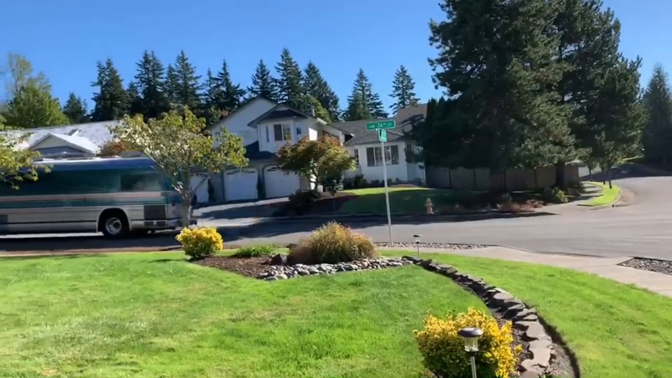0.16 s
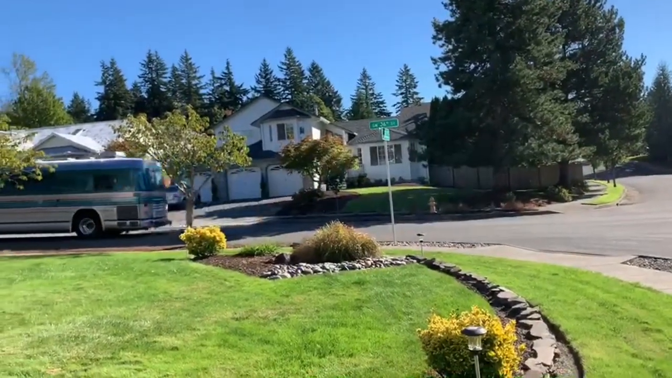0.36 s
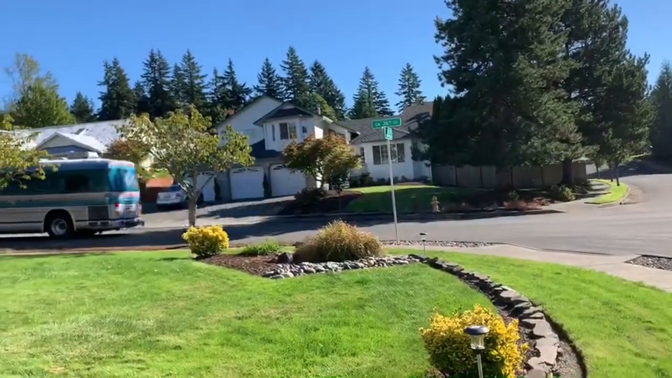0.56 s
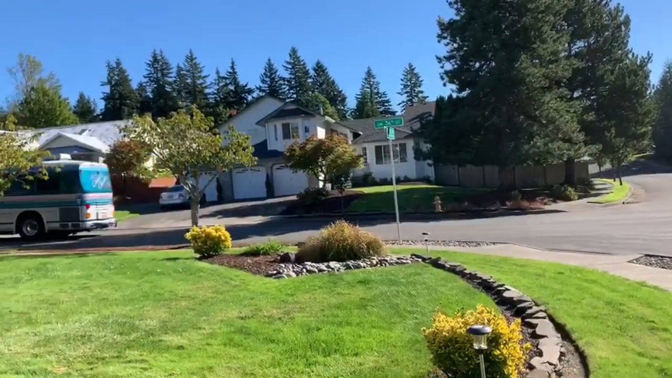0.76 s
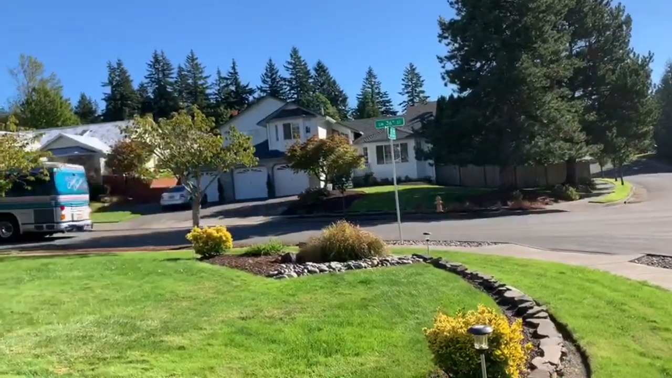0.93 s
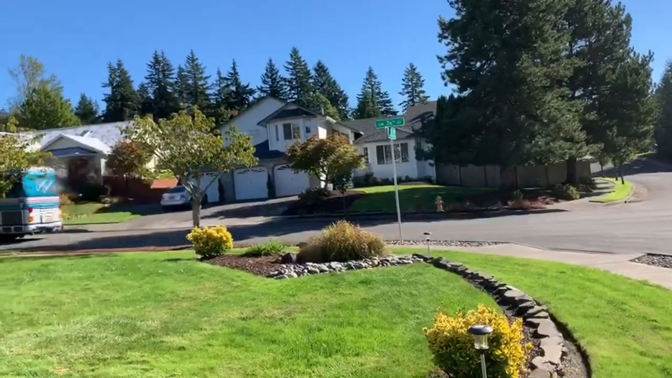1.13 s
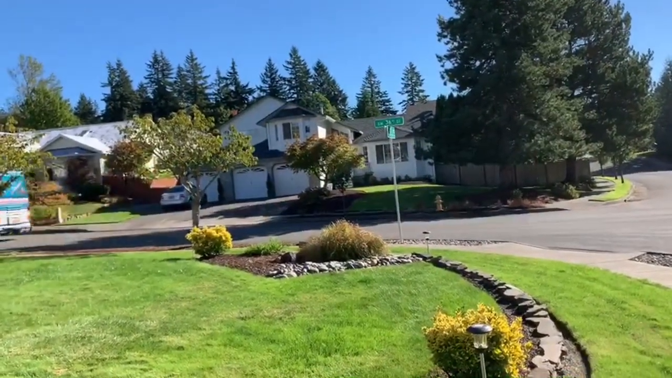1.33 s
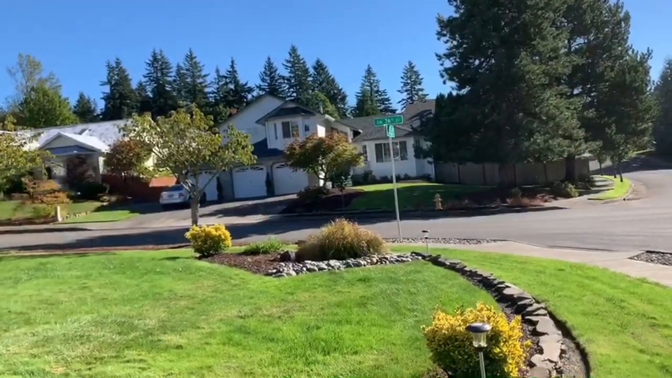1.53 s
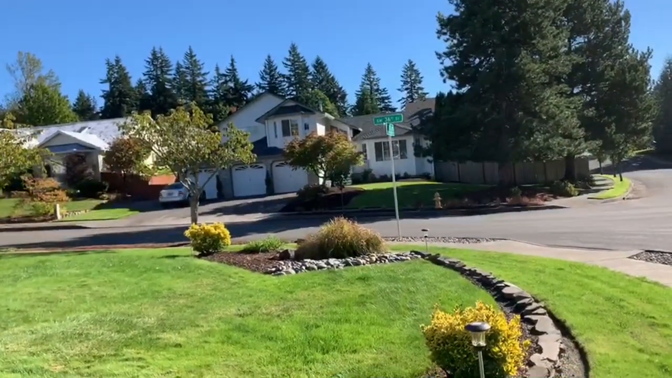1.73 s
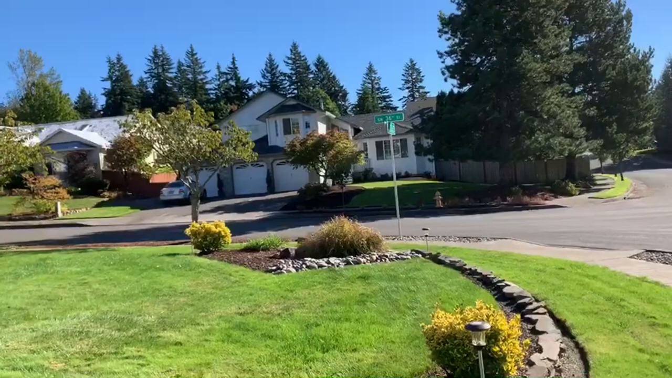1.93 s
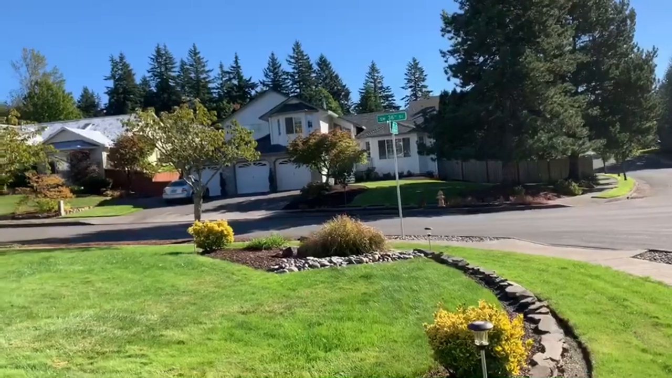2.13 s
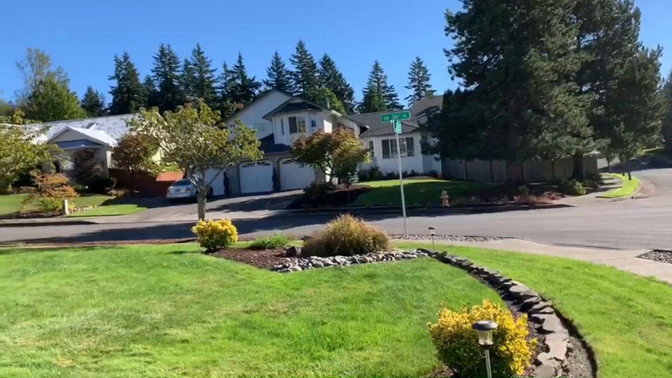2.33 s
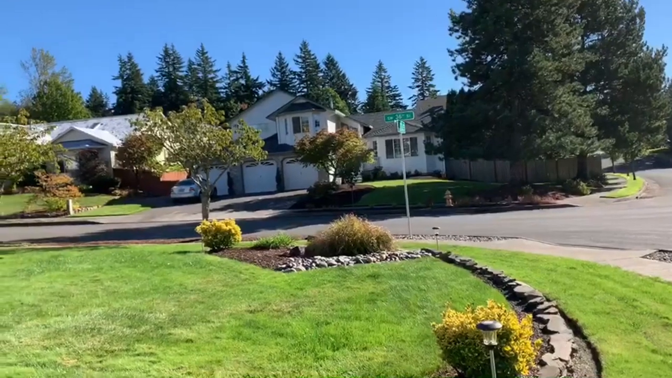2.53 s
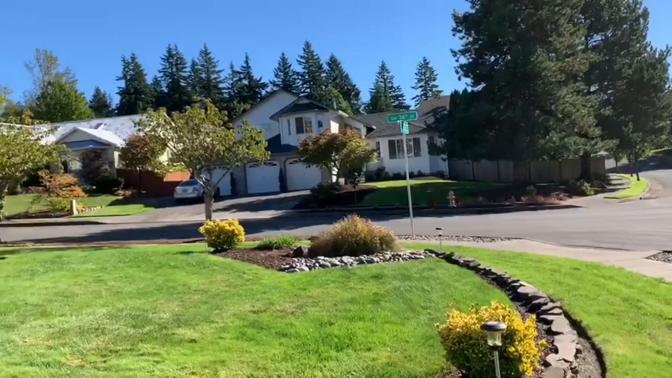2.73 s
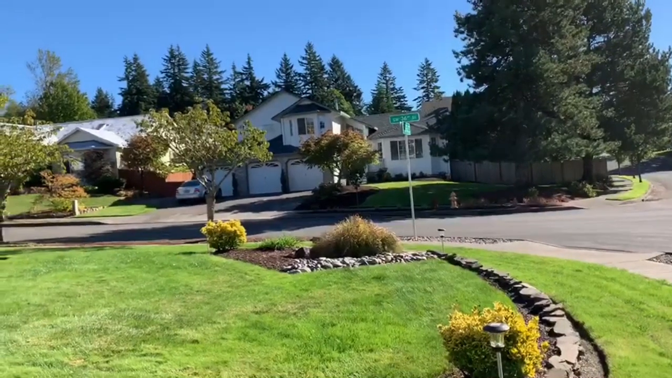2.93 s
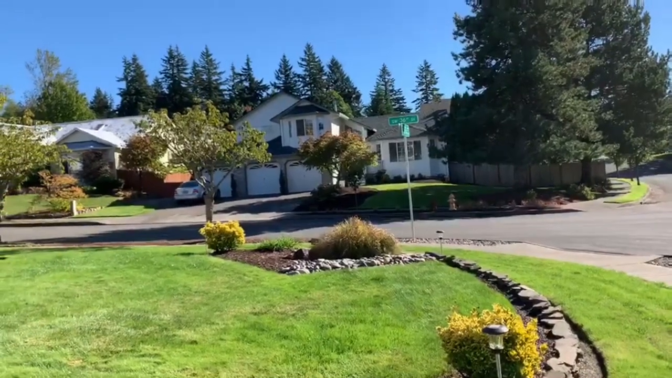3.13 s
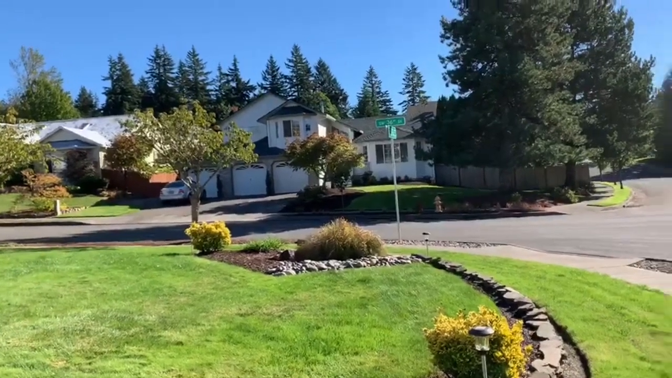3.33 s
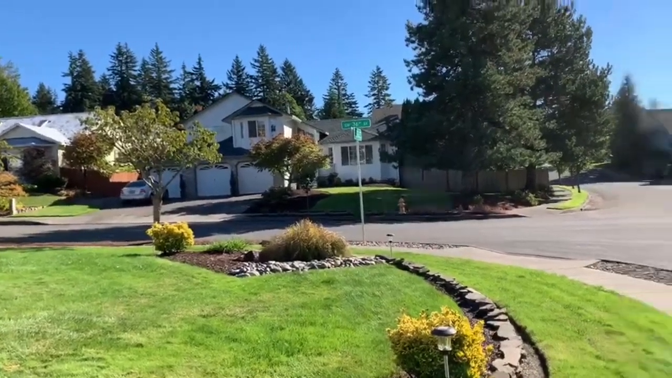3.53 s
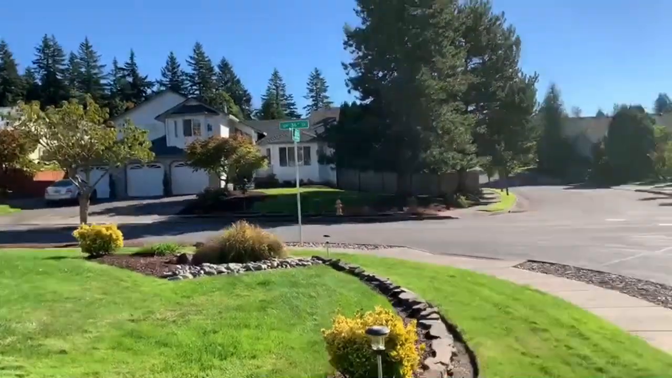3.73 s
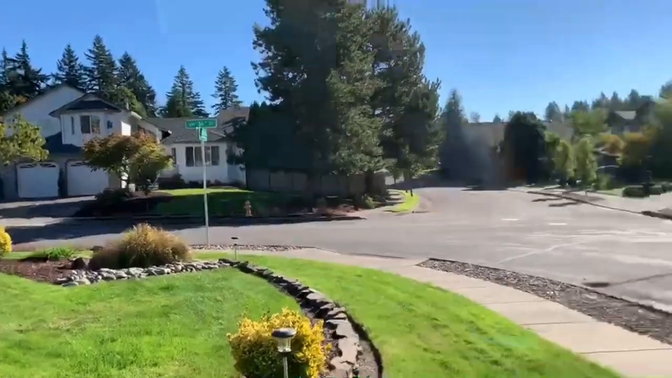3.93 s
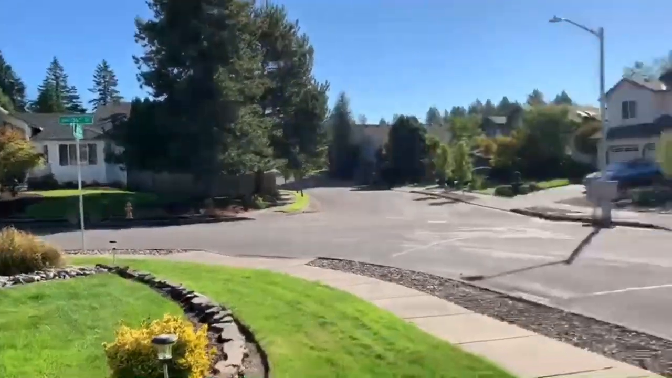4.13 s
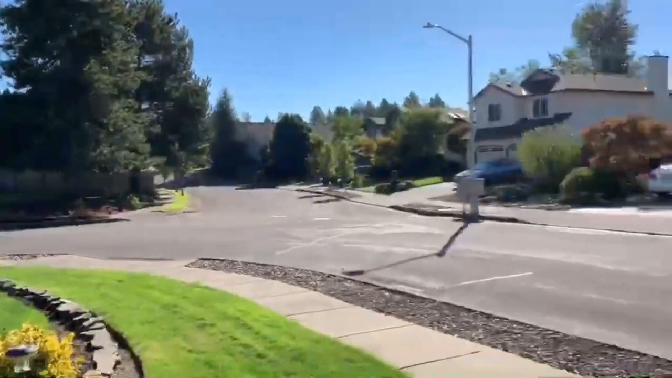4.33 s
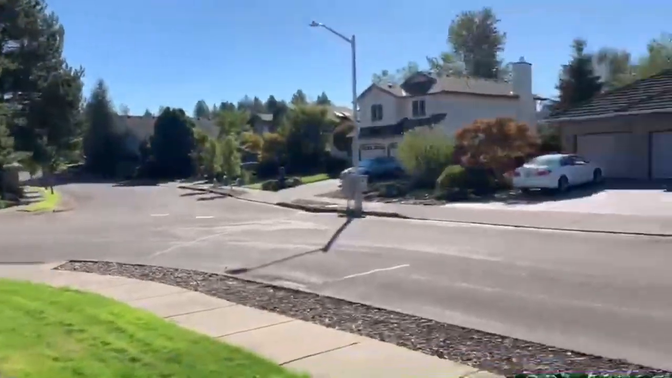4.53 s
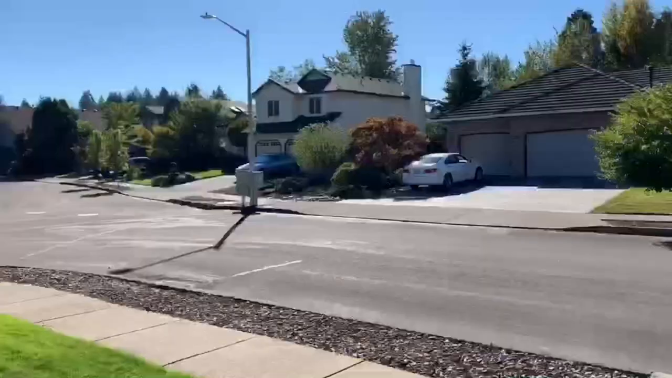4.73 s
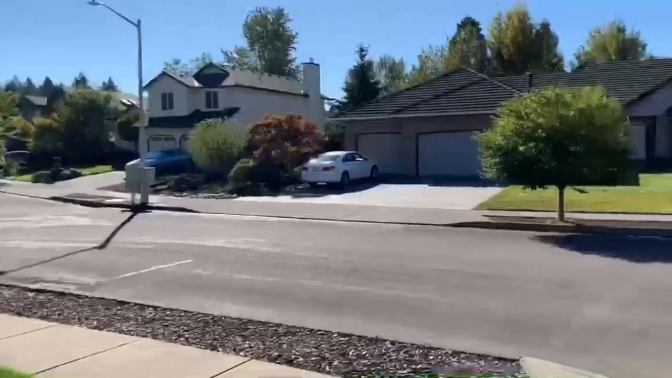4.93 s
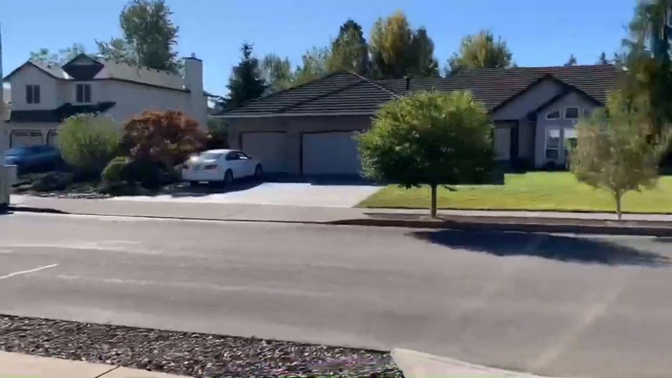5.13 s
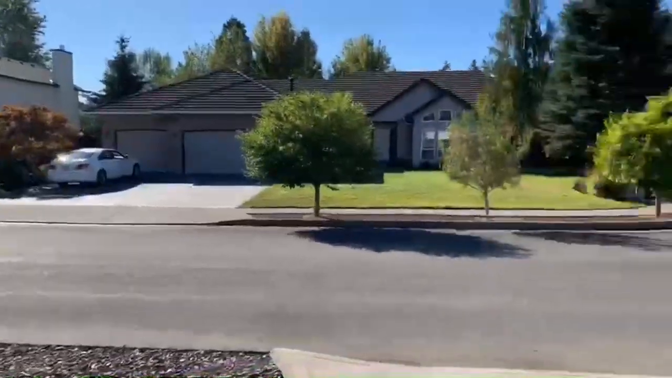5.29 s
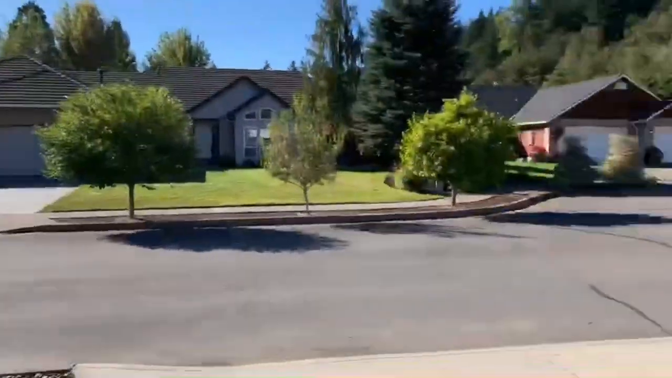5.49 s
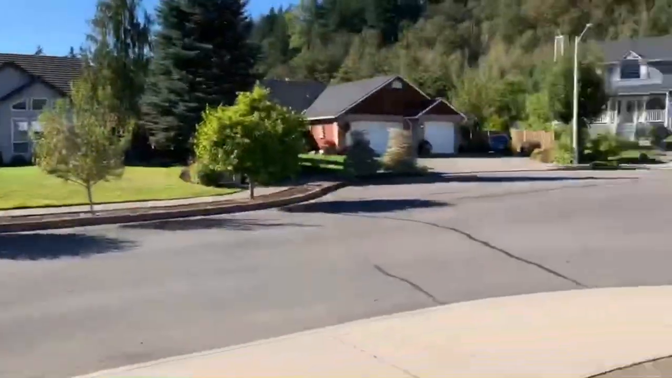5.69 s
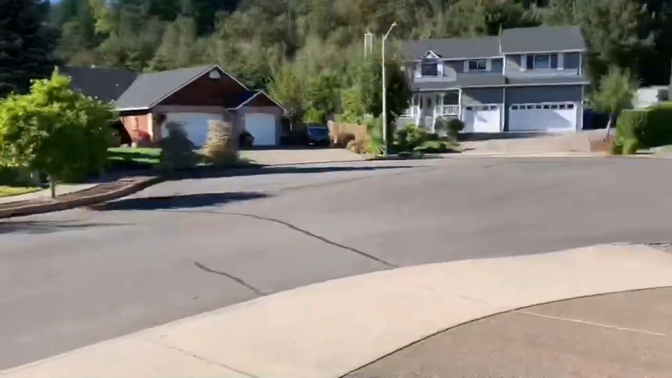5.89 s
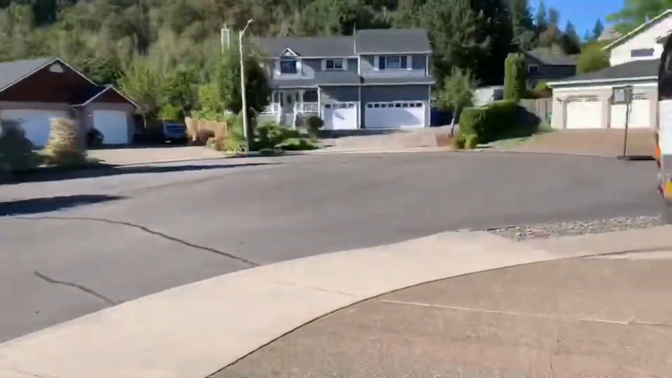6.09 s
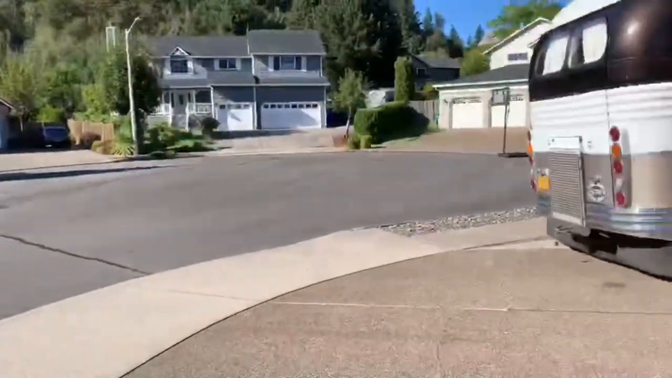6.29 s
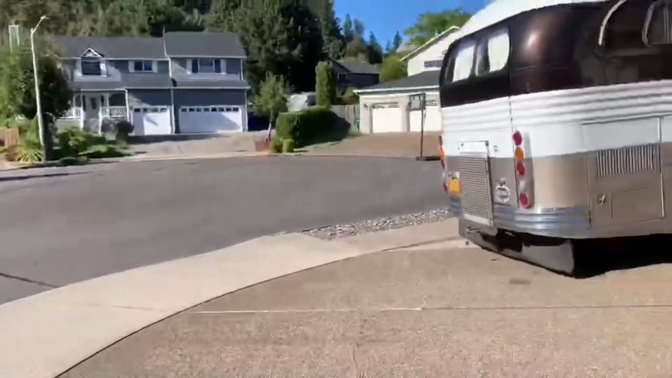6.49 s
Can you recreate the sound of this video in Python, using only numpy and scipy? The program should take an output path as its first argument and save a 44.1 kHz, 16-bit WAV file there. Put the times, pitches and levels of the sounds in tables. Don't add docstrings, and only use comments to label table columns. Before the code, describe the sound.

A strong low bus engine note, close at first, with airy fan and tyre noise, moves off along a suburban street. The pitch climbs a little and steadies; the tone flutters and dips as reflections cross it. Treble disappears first. Lumpy wind rumbles over the handheld stereo microphone past the middle, then the distant engine drops in pitch and weakens over faint street hum, with a dull tick.

```python
import sys
import numpy as np
from scipy import signal
from scipy.fft import rfft, irfft, next_fast_len
from scipy.io import wavfile
from scipy.ndimage import uniform_filter1d, map_coordinates

SR = 44100
rng = np.random.default_rng(int(sys.argv[2]) if len(sys.argv) > 2 else 0)


def boost_factor(decibels):
    exponent = np.asarray(decibels, float) / 20
    return 10 ** exponent


def waveform_to_disk(signal):
    frames = np.transpose(np.atleast_2d(signal))
    scaled = np.clip(frames, -1, 1) * 32767
    samples = np.round(scaled).astype(np.int16)
    wavfile.write(sys.argv[1], SR, samples)


N = 288842
T = np.arange(N) / SR

# (time [s], loss with distance [dB], treble screened by houses [dB])
DISTANCE = [(0, 0.5, 1.5), (.4, 1.5, -1), (1.15, 3.5, 0.5), (1.49, 3.5, 3.5), (1.6, 4, 1), (2.3, 7, 2.5),
            (2.42, 9.5, 8), (3.0, 13.5, 13), (3.3, 15.5, 13), (3.93, 15.5, 18), (4.29, 14.5, 22),
            (4.61, 15, 22.5), (4.76, 15.5, 28), (5.25, 15.5, 29), (5.5, 20, 31), (6.12, 25.5, 36),
            (6.55, 24, 37.5)]
# (roar, hiss, sizzle, air, weak orders) [dB]
NEAR_LEVELS = (-31.5, -35, -45, -49, -12.5)


def evened(x):
    return x / np.sqrt(np.mean(x ** 2) + 1e-20)


def curves(rows):
    s, *columns = np.transpose(rows)
    return [np.interp(T, s, c) for c in columns]


def read(points, hz):
    f, value = np.transpose(points)
    return np.interp(np.log(hz + 1), np.log(f + 1), value)


def bump(s, half, t=T):
    return np.exp(-.5 * ((t - s) / half) ** 2)


def swells(rows, floor_db):
    t = T[::64]
    power = sum((boost_factor(db) * bump(s, half, t)) ** 2 for s, db, half in rows)
    return np.sqrt(boost_factor(floor_db) ** 2 + np.interp(T, t, power))


def drift(top_hz, count):
    t, hz = T[::256], np.geomspace(.2, top_hz, num=16)[:, None]
    cycles = hz * t + rng.random((count, 16, 1))
    rows = (np.sin(2 * np.pi * cycles) / np.sqrt(hz)).sum(1)
    return [np.interp(T, t, evened(r)) for r in rows]


def noise(spectrum, patchy_db, size=1024):
    hop, hz = size // 4, np.fft.rfftfreq(size, 1 / SR)
    draws = rng.standard_normal((N // hop + 5, len(hz), 5)).T
    broad = uniform_filter1d(uniform_filter1d(draws[4], size=10, axis=0), size=16, axis=1)
    narrow = uniform_filter1d(uniform_filter1d(draws[4, ::-1], size=3, axis=0), size=50, axis=1)
    patches = evened(broad) + evened(narrow)
    z = (draws[:2] + 1j * draws[2:4]) * boost_factor(read(spectrum, hz)[:, None] + patchy_db * patches)
    z *= (hz <= spectrum[-1][0])[:, None]
    return evened(signal.istft(z, nperseg=size, noverlap=size - hop)[1][:, :N])


def delayed(x, lead_s):
    return map_coordinates(x, [np.arange(N) - lead_s * SR], order=3, mode="nearest")


def ears(direct, diffuse, share, lead_s):
    share = np.clip(share, 0, 1)
    pair = np.array([direct, delayed(direct, lead_s)])
    return np.sqrt(1 - share) * pair + np.sqrt(share) * diffuse


def resonate(x, hz, width):
    turn, r = np.exp(2j * np.pi * np.cumsum(hz) / SR), np.exp(-np.pi * width / SR)
    return 2 * (turn * signal.lfilter([1 - r], [1, -r], x / turn)).real


def crank():
    # (time [s], crank speed [turns/s])
    speed = [(0, 23.08), (.6, 23.65), (1.1, 23.93), (1.6, 23.97), (2.0, 24.26), (2.6, 24.15), (3.0, 24.07),
             (3.6, 24.1), (4.1, 23.99), (4.7, 24.27), (5.15, 23.74), (5.5, 23.2), (5.75, 22.53),
             (6.1, 22.47), (6.55, 21.3)]
    return np.cumsum(uniform_filter1d(curves(speed)[0], size=SR // 8, mode="nearest")) / SR


def order_wave(k, turns, sway):
    if k < 10:
        phase = 2.82 + 0.26 * (k - 6) ** 2 + 1.53 * (k - 6)
    else:
        phase = 2 * np.pi * rng.random()
    smear = .012 * k * (1 + k / 20) * sway
    return np.sqrt(2) * np.sin(2 * np.pi * k * turns + phase + smear)


def firing_order(turns):
    # (time [s], level [dB])
    direct_path = [(0, -7.5), (.26, -9.5), (.45, -8), (.7, -9.5), (1.5, -7.5), (2.6, -8.5), (3.8, -8.5),
                   (4.5, -13), (5.15, -13.5), (5.55, -11.5), (5.92, -16), (6.4, -23), (6.55, -20.5)]
    # (time [s], depth [dB], half length [s])
    cancels = [(1.12, 7, .12), (1.942, 19, 0.15), (3.099, 4, 0.13), (3.495, 4.5, 0.098), (4.116, 8, 0.21),
               (4.694, 2.5, 0.056), (5.352, 10.5, 0.094), (5.734, 20.5, 0.098), (6.048, 23, 0.065),
               (6.236, 17, 0.073), (6.504, 9, 0.045)]
    gain = boost_factor(curves(direct_path)[0])
    for s, depth_db, half in cancels:
        gain = gain * (1 - (1 - boost_factor(-depth_db)) * bump(s, half))
    return gain * boost_factor(.3 * drift(23.0, count=1)[0]) * order_wave(6, turns, 0)


def side_orders(turns):
    strong = (6, 7, 8, 9, 12, 15, 19, 18, 26, 33)
    # (time [s], peak level [dB], half length [s])
    seventh = [(0.247, -21, 0.052), (0.604, -34, 0.048), (0.81, -21.5, 0.12), (1.175, -19.5, 0.18),
               (1.916, -18.5, 0.088), (2.739, -26, .15), (3.064, -23, 0.15), (3.501, -24.5, 0.14),
               (3.846, -24.5, 0.13), (4.201, -24, 0.16), (4.544, -28, 0.089), (4.764, -27, 0.29),
               (5.05, -24.5, 0.043), (5.27, -22, 0.023), (5.678, -27, 0.026), (6.005, -32.5, 0.12),
               (6.418, -31, 0.063)]
    eighth = [(.6, -22.5, 0.13), (1.15, -21.5, 0.1), (1.75, -25, 0.28), (2.452, -33, 0.59),
              (3.65, -36, 0.048), (4.4, -33.5, 0.076), (4.9, -32.5, 0.11), (5.3, -40, 0.11)]
    ninth = [(.27, -18.5, 0.13), (.66, -17, 0.092), (1.03, -21, 0.1), (1.5, -17.5, 0.1), (1.93, -20, 0.15),
             (2.419, -30, 0.075), (2.78, -23, 0.17), (3.19, -21, 0.14), (3.55, -29, .1),
             (4.419, -28.5, 0.079), (4.92, -33, 0.078), (5.2, -35.5, 0.074), (5.48, -34, 0.038),
             (5.789, -27, 0.046), (6.04, -33.5, 0.18), (6.32, -37, 0.072), (6.56, -32, 0.048)]
    twelfth = [(.26, -24, 0.037), (.55, -24.5, 0.14), (.85, -25, 0.068), (1.07, -25.5, 0.057),
               (1.38, -26, 0.29), (1.8, -23.5, 0.17), (2.15, -28, 0.41), (2.55, -28, 0.24),
               (3.2, -25, 0.069), (3.502, -23.5, 0.11), (3.86, -37, 0.066), (4.2, -36, 0.089),
               (4.921, -33.5, 0.1), (5.4, -39.5, 0.036), (5.6, -45, .04), (5.8, -44, 0.043)]
    fifteenth = [(0, -32.5, 0.14), (.5, -33.5, 0.1), (.9, -30, 0.044), (1.3, -32, 0.24), (1.7, -28, 0.12),
                 (2.03, -26.5, 0.15), (2.551, -28, 0.21), (3.149, -33.5, 0.18), (3.6, -36.5, 0.2),
                 (4.25, -39, 0.051), (4.6, -37.5, 0.21), (4.95, -38.5, 0.086), (5.58, -43.5, 0.028),
                 (5.77, -40, 0.05)]
    nineteenth = [(.3, -46, 0.14), (1.5, -41, 0.21), (2.099, -36, 0.24), (2.57, -41, 0.23),
                  (3.15, -41, 0.12), (3.65, -42, 0.13), (3.95, -39.5, 0.091), (4.85, -38.5, 0.058)]
    eighteenth = [(.1, -36, 0.12), (.45, -40, .12), (.9, -38, 0.2), (1.3, -36.5, 0.17), (1.7, -34.5, .15),
                  (2.1, -34, 0.16), (2.5, -37.5, 0.13), (3.35, -46.5, .12), (3.75, -40, 0.093),
                  (4.75, -48.5, 0.087)]
    twenty_sixth = [(0.278, -51, 0.094), (.95, -46, .2), (1.5, -46, 0.064), (1.88, -40.5, .1),
                    (2.25, -47, 0.051), (2.8, -44, 0.17), (3.52, -38.5, .1), (4.001, -42, 0.12),
                    (4.599, -54, .15), (5.02, -50, .09)]
    thirty_third = [(.15, -47, .07), (0.519, -41.5, 0.088), (1.0, -38.5, 0.35), (1.45, -44, .15),
                    (1.85, -49, 0.14), (2.85, -50, .06)]
    tables = (seventh, eighth, ninth, twelfth, fifteenth, nineteenth, eighteenth, twenty_sixth, thirty_third)
    loss = curves(DISTANCE)[0]
    out = np.zeros(N)
    for k, rows, sway in zip(strong[1:], tables, drift(14.0, count=len(tables))):
        gain = swells(rows, -23 - 0.69 * loss - 0.89 * k)
        flutter_db = np.minimum(.22 * min(k, 15) * sway, 2.5) - .5
        out += gain * boost_factor(flutter_db) * order_wave(k, turns, sway)
    return out


def weak_orders(turns):
    # (crank order, level [dB])
    weak = [(3, -32), (4, -46), (5, -22.5), (13, -38), (14, -44.5), (16, -29.5), (17, -54.5), (20, -29.5),
            (21, -35), (22, -42), (23, -44), (24, -42.5), (25, -36), (27, -32), (28, -35), (30, -38.5),
            (31, -36), (32, -37.5), (34, -39.5), (35, -49.5), (36, -45.5), (39, -50), (42, -41),
            (43, -42.5), (44, -49)]
    lift_db = -17.5 * np.maximum(T - 4.94, 0)
    gain = boost_factor(NEAR_LEVELS[4] - 0.44 * curves(DISTANCE)[0] + lift_db)
    fades = [evened(f - uniform_filter1d(f, size=SR)) for f in drift(7.0, count=len(weak) + 1)]
    sways = drift(14.0, count=len(weak))
    out = np.zeros((2, N))
    for row, ((k, db), sway) in enumerate(zip(weak, sways)):
        paths = np.array([fades[row], .6 * fades[row] + .8 * fades[row + 1]])
        out += boost_factor(db) * gain * (.3 + .95 * paths) * order_wave(k, turns, sway)
    return out


def exhaust(turns):
    # (time [s], lead of the left side [ms], left-right balance of the firing order [dB])
    bearing = [(0, 0.15, -1.5), (1, 0.14, -1.5), (2, 0.23, 0.5), (3, 0.27, -3), (3.5, 0.52, -5),
               (3.9, 0.5, -1), (4.3, 0.5, 6.5), (5, 0.22, -0.5), (5.9, .46, -3), (6.55, 0.93, -3.5)]
    lead_ms, balance_db = curves(bearing)
    lead_s = lead_ms / 1000
    firing = ears(firing_order(turns), 0, 0, lead_s) * boost_factor(np.outer([.5, -.5], balance_db))
    left, right = side_orders(turns) + weak_orders(turns)
    return firing + np.array([left, delayed(right, lead_s)])


def layer_levels():
    # (time [s], gain [dB], half length [s])
    glimpses = [
        (1.01, -4, 0.75),
        (2.006, -1, 0.12),
        (3.572, 3.5, 0.054),
        (3.948, 5.5, 0.066),
        (4.57, 11, 0.12),
    ]
    # (time [s], gain [dB], half length [s])
    air_puffs = [(.52, 0, 0.025), (1.18, 1, 0.033), (1.903, 3.5, 0.03), (2.227, 3.5, 0.034),
                 (4.51, 2, .012), (4.62, -1, .012), (5.487, 6, 0.033)]
    # (time [s], gain [dB], half length [s])
    whistle = (4.95, 6, .35)
    whistle_s, whistle_db, whistle_half = whistle
    near_roar, near_hiss, near_sizzle, near_air = NEAR_LEVELS[:4]
    loss, screen = curves(DISTANCE)
    glimpse = sum(db * bump(s, half) for s, db, half in glimpses)
    puff = sum(db * bump(s, half) for s, db, half in air_puffs)
    flicker = drift(19.0, count=1)[0]
    flicker = evened(flicker - uniform_filter1d(flicker, size=SR // 8))

    roar_db = near_roar - loss + 8.5
    fan_db = -3 * np.exp(-T / 0.56)
    hiss_db = near_hiss - 0.41 * loss - 0.34 * (screen - 0.42 * glimpse) + 0.46 * puff + fan_db
    sizzle_db = near_sizzle - screen + glimpse + 0.55 * puff + 0.35 * flicker
    air_change = -0.96 * screen + puff + flicker
    microphone_hiss_db = -90
    top_db = 10 * np.log10(boost_factor(-55.5 + 1.85 * air_change) ** 2 + boost_factor(microphone_hiss_db) ** 2)
    air_db = near_air + air_change + whistle_db * bump(whistle_s, whistle_half) - .6 * puff
    return roar_db, hiss_db, sizzle_db, air_db, top_db


def body(turns):
    # (frequency [Hz], density [dB per Hz]); the top is lost first in the air
    roar = [(30, -29), (60, -11.5), (300, -1), (500, -11), (700, -8.5), (1000, -12.5), (1400, -16.5),
            (1900, -31)]
    hiss = [(900, -29), (1300, -12.5), (1800, -5), (2500, -4.5), (3300, -2), (4200, -7), (5200, -12),
            (6200, -18.5)]
    sizzle = [(4500, -21), (5500, 4.5), (6500, 5), (7500, 0.5), (8200, -4), (9000, -23)]
    air = [(6800, -20.5), (7600, -6.5), (8100, -2), (8600, 6), (9200, 3), (10000, -1.5), (11500, -20.5)]
    top = [(9500, -28.5), (10500, 5), (13000, -1), (15600, 0), (15900, -63)]
    # (time [s], low centre [Hz], high centre [Hz], low gain, high
    hiss_bands = [(0, 2440, 3490, 0.18, 0.26), (.45, 2840, 4330, 0.3, 0.85), (1.17, 2350, 4400, 0.36, 0.98),
                  (1.6, 2340, 4000, 0.64, 0.35), (2.4, 2310, 3850, 0.91, 0.84), (3.2, 2365, 3350, 1.6, 0.48),
                  (3.8, 2260, 3700, 2.2, 1), (4.32, 2095, 4300, 1, 0.99), (4.8, 1964, 3880, 4.3, 0.26),
                  (5.25, 1910, 3890, 2.2, 0.088), (5.53, 2300, 3680, 0.83, 0.28), (5.9, 1980, 3980, 3.1, 0.59),
                  (6.55, 2040, 3780, 1.9, 0.51)]
    roar_db, hiss_db, sizzle_db, air_db, top_db = layer_levels()
    low_hz, high_hz, low, high = curves(hiss_bands)
    puffs = np.cos(2 * np.pi * 6 * turns) + np.cos(2 * np.pi * 3 * turns) + 0.94 * np.cos(2 * np.pi * turns)
    layers = (  # spectrum, level dB, puff depth, diffuse share, wandering bands
        (roar, roar_db, .15, .42, False),
        (hiss, hiss_db, .1, .38, True),
        (sizzle, sizzle_db, .08, .3, False),
        (air, air_db, .1, .2, False),
        (top, top_db, .1, .2, False))
    out = np.zeros((2, N))
    for spectrum, db, depth, share, banded in layers:
        direct, scatter = noise(spectrum, patchy_db=1.2 if banded else 1.7)
        both = np.array([direct * (1 + depth * puffs), scatter, np.roll(scatter, SR // 10)])
        if banded:
            bands = low * resonate(both, low_hz, 680) + high * resonate(both, high_hz, 1100)
            both = 0.68 * (both + 0.99 * bands)
        out += boost_factor(db) * ears(both[0], both[1:], share, 1 / low_hz)
    return out


def wind():
    # (time [s], peak level [dB], half length [s])
    gusts = [(.2, -32, 0.1), (.49, -35, 0.05), (.76, -33.5, 0.069), (1.06, -37, 0.1), (1.83, -36, 0.076),
             (2.1, -35.5, 0.085), (2.4, -40.5, 0.18), (3.0, -40.5, 0.073), (3.21, -39.5, .05),
             (3.48, -44.5, 0.038), (3.78, -34.5, 0.11), (4.02, -32, 0.093), (4.42, -27, 0.046),
             (4.63, -16.5, 0.046), (4.84, -23, 0.04), (5.0, -31, 0.042), (5.15, -25, 0.046),
             (5.27, -27, 0.046), (5.33, -28.5, .16), (5.42, -25, 0.12), (5.56, -30, 0.1),
             (6.03, -44, 0.054), (6.56, -39, 0.031)]
    # (frequency [Hz], density [dB per Hz])
    buffeting = [(15, -34.5), (35, -24.5), (60, 3.5), (100, -4.5), (140, 5.5), (250, -27), (500, -47)]
    a, b = noise(buffeting, patchy_db=1.2, size=2048)
    return swells(gusts, -45.5) * np.array([a + 0.16 * b, a - 0.65 * b])


def tick():
    # (time [s], level [dB], lower mode [Hz])
    knocks = [
        (6.1816, -33, 1900),
    ]
    out = np.zeros(N)
    for s, db, hz in knocks:
        t = np.maximum(T - s, 0)
        crack = uniform_filter1d(rng.standard_normal(N), size=2) * boost_factor(-60 * t / .006)
        ring = np.sin(2 * np.pi * hz * t) + .9 * np.sin(2 * np.pi * 1.9 * hz * t) * boost_factor(-60 * t / .008)
        out += boost_factor(db - 60 * t / .012) * np.minimum(t / .0002, 1) * (ring + .22 * crack)
    return out


def street():
    # (frequency [Hz], density [dB per Hz])
    hum = [(30, -19), (70, -0.5), (200, -3), (500, -21.5), (1000, -34.5), (4000, -41), (6000, -50.5),
           (9000, -77)]
    c, d = noise(hum, patchy_db=1.0)
    return boost_factor(-39.5) * np.array([c + 0.34 * d, c - 1.1 * d])


def whine():
    # (frequency [Hz], level [dB])
    lines = [(10880, -81), (11170, -82)]
    sink_db = -2 - 10 * np.maximum(T - 5.2, 0)
    return sum(np.sqrt(2) * boost_factor(db + sink_db) * np.sin(2 * np.pi * hz * T) for hz, db in lines)


def scene():
    turns = crank()
    return exhaust(turns) + body(turns) + wind() + tick() + street() + whine()


def roll_off(x):
    return signal.sosfilt(signal.butter(12, 17100, fs=SR, output="sos"), x)


def record(dry):
    # (frequency [Hz], gain [dB])
    width = [(100, 0.5), (250, -5), (450, -3.5), (700, -2.5), (1500, 2), (2400, 2), (3500, -5), (5000, 1.5)]
    # (frequency [Hz], phase [half turns])
    treble_phase = [(6000, -.3), (6700, .05), (8600, 1.0), (11100, 2.0), (13100, 2.9), (14200, 3.2), (15600, 4.0)]
    size = next_fast_len(N + SR // 4)
    edges = np.clip(np.minimum(T, T[::-1]) / .0015, 0, 1)
    left, right = rfft(dry * edges, size, axis=1)
    hz = np.fft.rfftfreq(size, 1 / SR)
    mid, side = (left + right) / 2, (left - right) / 2 * boost_factor(read(width, hz))
    left, right = mid + side, mid - side
    tied = .97 * np.clip((hz - treble_phase[0][0] + 1500) / 3500, 0, 1)
    right = np.sqrt(1 - tied ** 2) * right + tied * left * np.exp(-1j * np.pi * read(treble_phase, hz))
    left = left * boost_factor(read([(2000, 0.97), (4000, -0.18), (7000, -0.5)], hz))
    low_cut = hz ** 2 / (hz ** 2 + 30 ** 2)
    wet = irfft(np.array([left, right]) * low_cut, size, axis=1)[:, :N]
    over = np.maximum(abs(wet) - .7, 0)
    wet = wet - np.sign(wet) * (over - .22 * np.tanh(over / .22))
    band_limit = signal.firwin(255, 15800, window=("kaiser", 8), fs=SR)
    wet = signal.oaconvolve(wet, band_limit[None], "same")
    return roll_off(wet)


dry = scene()
out = record(dry)
waveform_to_disk(out)
```